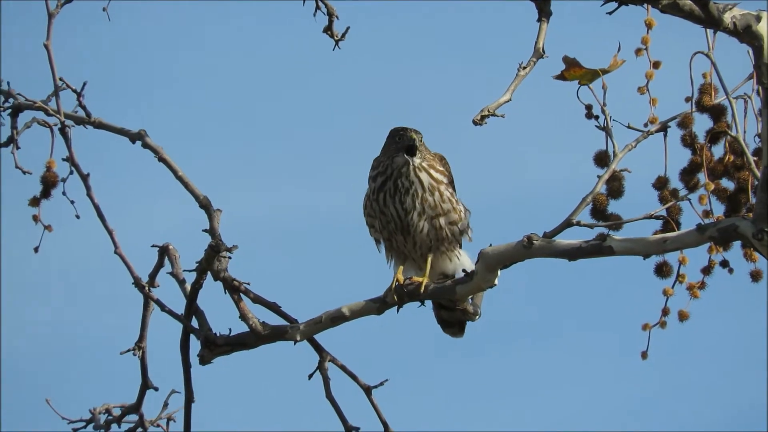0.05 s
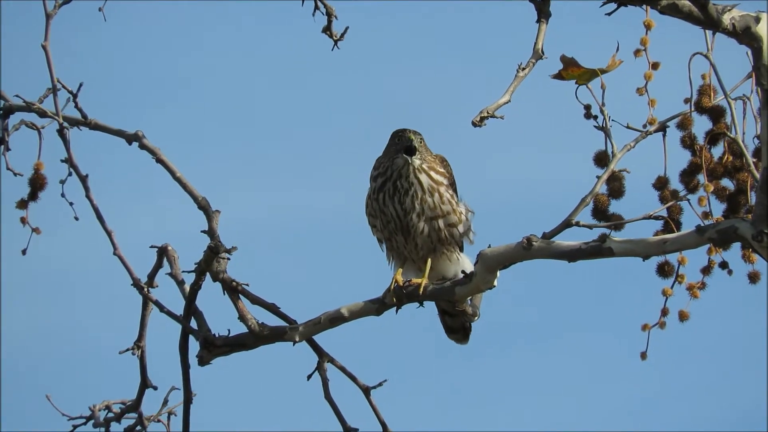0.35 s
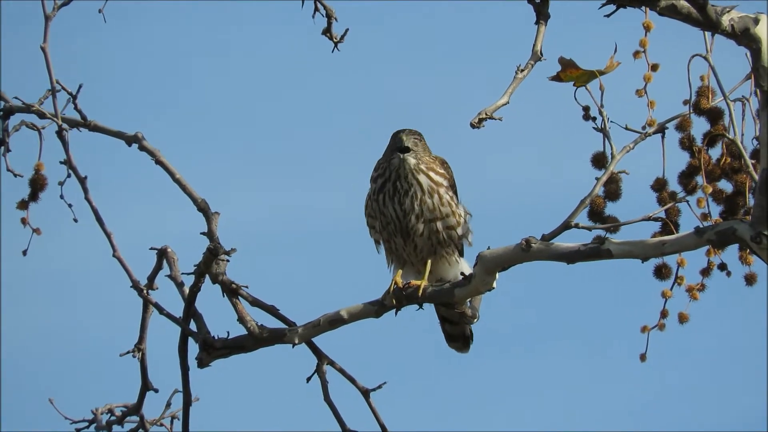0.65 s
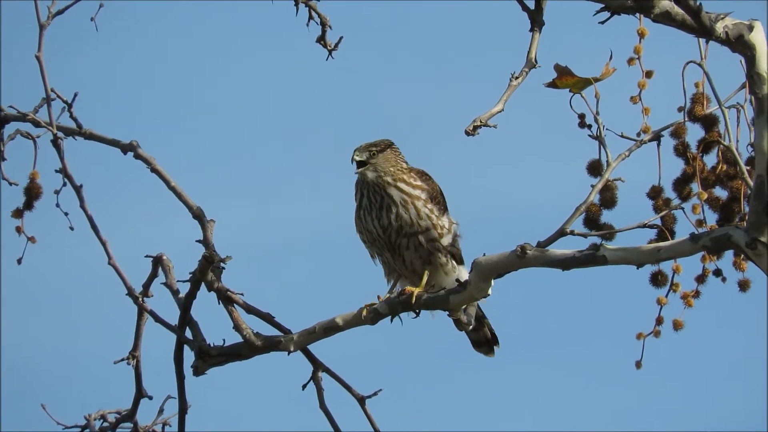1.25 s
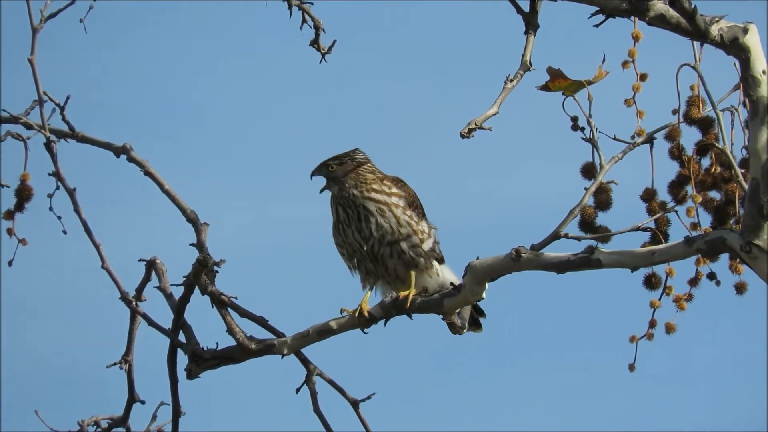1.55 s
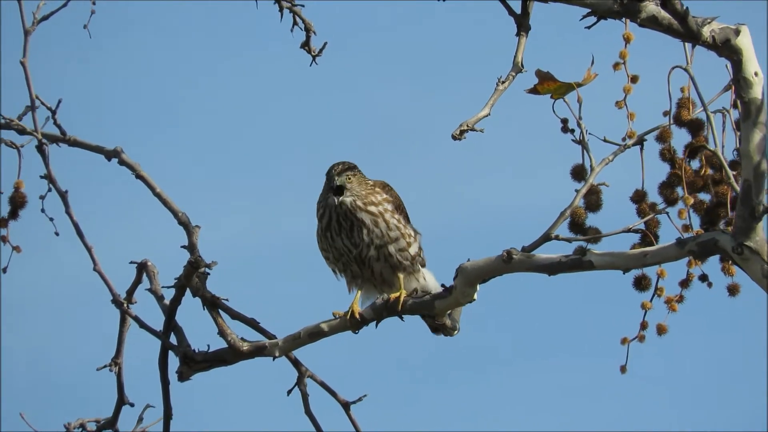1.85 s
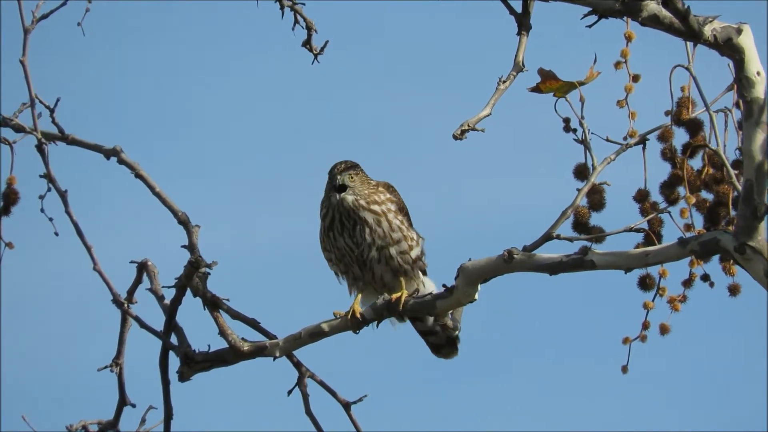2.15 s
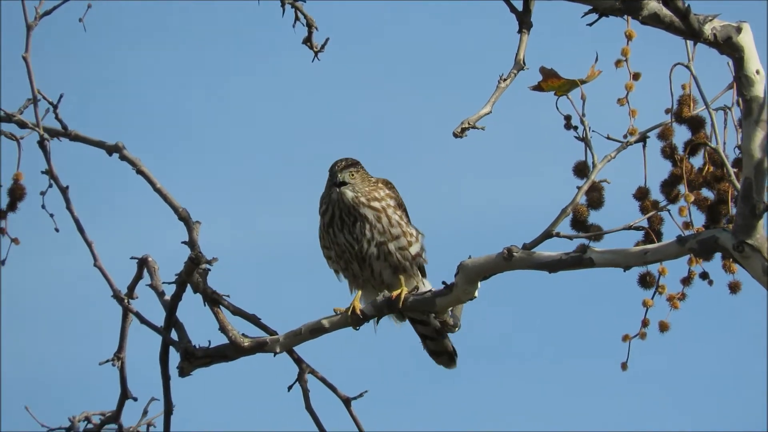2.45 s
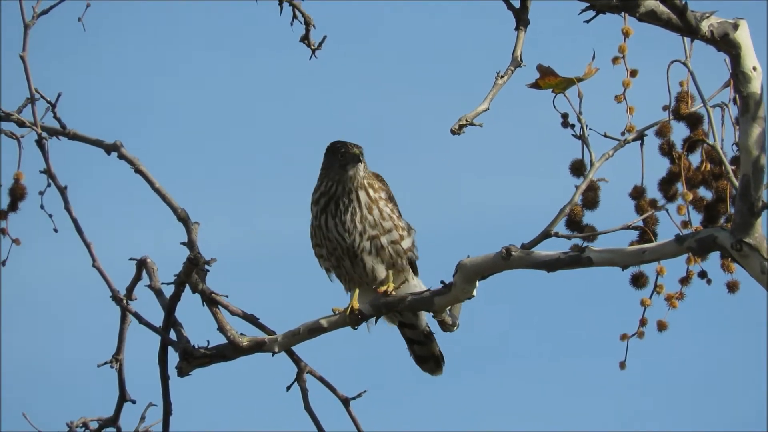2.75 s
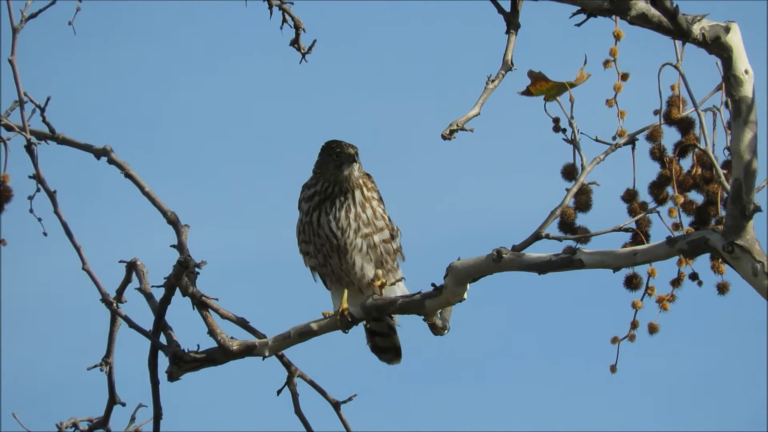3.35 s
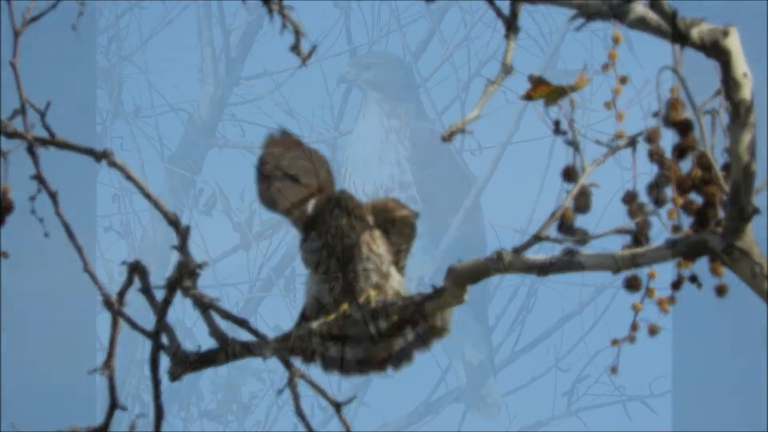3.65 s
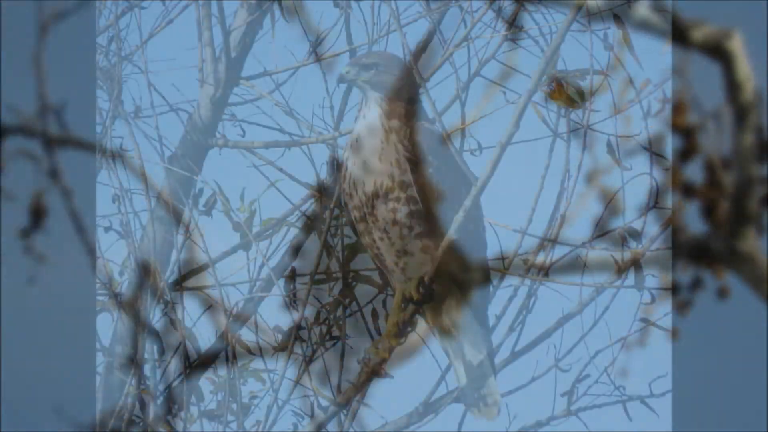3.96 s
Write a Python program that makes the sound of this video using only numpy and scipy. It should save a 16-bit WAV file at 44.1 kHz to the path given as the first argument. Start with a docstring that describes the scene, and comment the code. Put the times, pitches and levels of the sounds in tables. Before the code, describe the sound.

A hawk repeats short, raspy calls among trees, over faint bird whistles and far road noise. The calls and traffic drop in level, then the hawk stops, leaving low gusts of wind on the microphone.

```python
"""A hawk scolds with twenty harsh 'kek' notes, seven a second. Each is a pulsed source filtered by
the throat: a short arch of pitch that starts and ends in a rasp, scattered back by the trees.
Small birds whistle far off, distant traffic rumbles, and turbulent gusts buffet the microphone.
The hawk, the small birds and the traffic get quieter together in two steps."""
import sys
import numpy as np
from scipy import signal
from scipy.fft import rfft, irfft
from scipy.io import wavfile
from scipy.ndimage import uniform_filter1d

SR = 44100
rng = np.random.default_rng(int(sys.argv[2]) if len(sys.argv) > 2 else 0)


def wav_record(signal):
    """Record a signal, one row per channel, as 16-bit PCM in the file named by sys.argv[1]."""
    frames = np.transpose(np.atleast_2d(signal))
    bounded = np.clip(frames, -1, 1)
    # unit amplitude maps onto the largest positive 16-bit level
    quanta = np.round(bounded * 32767).astype(np.int16)
    wavfile.write(sys.argv[1], SR, quanta)


N = 176400
TIME = np.arange(N) / SR


def from_db(db):
    """Amplitude ratio: a factor of ten for every 20 dB."""
    return 10 ** (np.asarray(db) / 20)


def unit_rms(x):
    """Normalisation to a mean power of one."""
    return x / np.sqrt(np.mean(x ** 2) + 1e-20)


def gain_curve(rows):
    """Gain over time, by linear interpolation in decibels."""
    return from_db(np.interp(TIME, *np.transpose(rows)))


def db_at(spectrum, hz):
    """Level of a spectrum, by interpolation in log frequency."""
    f, db = np.transpose(spectrum)
    return np.interp(np.log(np.maximum(hz, 1)), np.log(f), db)


def noise(spectrum, size):
    """Spectral shaping: white noise filtered to a given colour, at unit rms."""
    gain = from_db(db_at(spectrum, np.fft.rfftfreq(size, 1 / SR)))
    return unit_rms(irfft(rfft(rng.standard_normal(size)) * gain, size))


def drift(corner_hz, size):
    """Low-pass noise: a smooth random wander at unit rms."""
    f = np.fft.rfftfreq(size, 1 / SR)
    return unit_rms(irfft(rfft(rng.standard_normal(size)) / (1 + (f / corner_hz) ** 2), size))


def add(out, start_s, x):
    """Superposition of a sound from a given moment."""
    i = max(int(start_s * SR), 0)
    out[i:i + len(x)] += x[:max(N - i, 0)]


# Swell of the road roar. Each row: time in seconds, relative level in dB.
ROAD_SWELL = [(0, -24.5), (.6, -24.5), (1.35, -27.5), (1.9, -26.5), (2.2, -32.5), (2.85, -28), (3.4, -26.5),
              (4, -25.5)]
# Its spectrum. Each row: frequency in Hz, relative level in dB.
ROAD_SPECTRUM = [(25, -19), (60, -2), (185, -2.5), (250, 1.5), (370, -3.5), (520, -0.5), (720, -2.5),
                 (1050, -7), (1450, -15.5), (2000, -17), (2700, -25), (3900, -22.5), (4700, -34),
                 (8000, -37.5), (16000, -40.5)]
# Far engines. Each row: frequency in Hz, relative level in dB.
ENGINE_TONES = [(532, -39), (611, -37)]

def traffic():
    """Broadband road noise plus tonal engine hum under slight frequency modulation."""
    hum = np.zeros(N)
    for hz, db in ENGINE_TONES:
        pitch = hz * (1 + .0079 * drift(24.2, N))
        hum += from_db(db) * np.sin(2 * np.pi * np.cumsum(pitch) / SR)
    return gain_curve(ROAD_SWELL) * noise(ROAD_SPECTRUM, N) + hum


# Sharp buffets. Each row: time in seconds, half-width of the push in seconds, relative level in dB.
BUFFETS = [(2.1092, .0007, -3), (2.161, .0011, -12.5)]

def buffets():
    """Pressure transients on the microphone, each a short push inside a longer pull."""
    out = np.zeros(N)
    for centre, width, db in BUFFETS:
        u = (TIME - centre) / width
        out += from_db(db) * (1.59 * np.exp(-u ** 2) - np.exp(-(u / 3.6 - .5) ** 2))
    return out


# Underlying breeze. Each row: time in seconds, relative level in dB.
BREEZE_LEVEL = [(0, -17), (.45, -23), (1.05, -23.5), (1.25, -32), (1.65, -25.5), (2.2, -23.5),
                (2.35, -35.5), (2.55, -44.5), (2.9, -38), (3.3, -32), (3.62, -42.5), (4, -46)]
# Gusts. Each row: centre in seconds, half-width in seconds, relative level in dB.
WIND_GUSTS = [(.018, 0.0064, -11), (.22, 0.026, -19.5), (.39, 0.049, -14.5), (.888, 0.014, -16),
              (1.005, 0.014, -14), (1.412, 0.017, -11.5), (1.477, 0.014, -7.5), (1.529, 0.023, -15.5),
              (1.599, 0.005, -10), (1.961, 0.023, -15.5), (2.04, 0.042, -20), (2.11, 0.031, -20.5),
              (2.18, 0.048, -28), (2.694, 0.025, -25.5), (3.079, .018, -19), (3.127, 0.018, -19),
              (3.43, .012, -18), (3.472, 0.01, -16), (3.749, 0.024, -31.5)]
# Spectrum of the turbulence. Each row: frequency in Hz, relative level in dB.
EDDY_SPECTRUM = [(20, -15.5), (45, 0), (65, 2.5), (130, -3.5), (240, -16), (400, -30), (800, -38.5),
                 (8000, -85)]

def wind():
    """Turbulence on the microphone: a low rumble in which breeze and gusts add in power."""
    power = gain_curve(BREEZE_LEVEL) ** 2
    for centre, width, db in WIND_GUSTS:
        power += from_db(db) ** 2 * np.exp(-((TIME - centre) / width) ** 2)
    eddies = noise(EDDY_SPECTRUM, N)
    eddies /= np.sqrt(uniform_filter1d(eddies ** 2, size=1400) + .097)  # evens out chance swells
    return np.sqrt(power) * eddies


# Far birds. Each row: start and length in seconds, first, middle and last pitch in Hz,
# relative level in dB.
BIRD_WHISTLES = [(0.248, .12, 3020, 3036, 3020, -33.5), (.767, 0.13, 1800, 1970, 2050, -36.5),
                 (0.931, .25, 2047, 2145, 1897, -39.5), (3.76, .075, 6350, 6450, 6450, -47)]

def far_whistles(waver_hz=119, flutter=.44):
    """Gliding pure tones, roughened by random frequency and amplitude modulation."""
    out = np.zeros(N)
    for start, length, first, middle, last, db in BIRD_WHISTLES:
        u = np.linspace(0, 1, int(length * SR))
        glide = np.polyval(np.polyfit([0, .5, 1], [first, middle, last], 2), u)
        phase = 2 * np.pi * np.cumsum(glide + waver_hz * drift(170, SR)[:len(u)]) / SR
        envelope = np.abs(np.sin(np.pi * u)) ** .5 * (1 + flutter * drift(100, SR)[:len(u)])
        add(out, start, from_db(db) * envelope * np.sin(phase))
    return out


# Spectrum of a small bird's chip. Each row: frequency in Hz, relative level in dB.
CHIP_SPECTRUM = [(2500, -20), (3800, 0), (6300, -6), (8500, -15), (11000, -30)]

def far_chip(start_s=3.759, gain_db=-38, attack_s=.005, decay_s=.035):
    """One dry chip: a noise burst with exponential decay."""
    out = np.zeros(N)
    t = TIME[:SR // 2]
    envelope = np.minimum(t / attack_s, 1) * np.exp(-t / decay_s)
    add(out, start_s, from_db(gain_db) * noise(CHIP_SPECTRUM, len(t)) * envelope)
    return out


# Resonances of the hawk's throat, dark and bright. Each row: frequency in Hz, relative gain in dB.
DARK_THROAT = [(900, -15), (2100, -13), (2450, 0), (2850, 3.5), (3250, 2.5), (4150, -7.5), (4900, -12.5),
               (6400, -23.5), (7200, -31), (8400, -19.5), (10500, -29), (15000, -48)]
BRIGHT_THROAT = [(1400, -10), (2150, -5), (2450, -6.5), (2750, 4), (3200, -8), (3750, 2), (4350, 4),
                 (4650, -0.5), (5050, -18), (5950, -5), (7100, -26), (8500, -9), (10300, -30), (15000, -40)]

def throat_response(darkness):
    """Formant filter: a blend in decibels from bright (0) to dark (1)."""
    hz = np.geomspace(600, 16000, 120)
    return np.c_[hz, (1 - darkness) * db_at(BRIGHT_THROAT, hz) + darkness * db_at(DARK_THROAT, hz)]


def creak(t, onset_s=.0015, pulse_hz=420, decay_s=.0082, gain_db=-2):
    """The hard 'k': dark noise, amplitude-modulated by a few uneven, abrupt pulses."""
    started = t > onset_s
    cycles = np.cumsum(pulse_hz * (1 + .25 * drift(JITTER_HZ, len(t))) * started) / SR
    pulses = unit_rms(np.exp(-2 * (cycles % 1))) * started
    return from_db(gain_db) * noise(DARK_THROAT, len(t)) * pulses * np.exp(-t / decay_s)


NOTE_S, ATTACK_S, HOLD_S, FADE_DB, RELEASE_S = .0458, .012, .02, 10, .0064
TOP_S, RISE, SAG = .023, .24, .07  # moment of top pitch; curvature of the arch before and after it
CLEAR_FROM_S, CLEAR_UNTIL_S, BLEND_S = .0079, .852 * NOTE_S, .0027  # the span free of rasp
JITTER_HZ, WANDER_HZ = 470, 42  # bandwidths of fast and slow unsteadiness
OPEN_S, SHUT_DB_PER_OCTAVE, TILT_ABOVE_HZ = .0099, -14, 3600  # the treble opens late
FORMANT_LIFT, FORMANT_SINK_S = .092, .029  # resonances start this share high, then sink into place

def kek(top_hz, darkness):
    """Source-filter model of one note: jitter, shimmer and breath noise make both ends rasp."""
    t = TIME[:4096]
    pitch = top_hz * (1 - np.where(t < TOP_S, RISE, SAG) * np.minimum((t / TOP_S - 1) ** 2, 2))
    rasp = 1 + .5 * (np.tanh((t - CLEAR_UNTIL_S) / BLEND_S) - np.tanh((t - CLEAR_FROM_S) / BLEND_S))
    jitter = (.013 + .0696 * rasp) * drift(JITTER_HZ, len(t))
    wander = .0076 * drift(WANDER_HZ, len(t))
    phase = 2 * np.pi * np.cumsum(pitch * (1 + jitter + wander)) / SR

    throat = throat_response(darkness)
    orders = np.arange(1, 19)[:, None]
    formant_scale = 1 + FORMANT_LIFT * np.maximum(1 - t / FORMANT_SINK_S, 0)
    shut = np.exp(-(t / OPEN_S) ** 2)
    db = db_at(throat, orders * pitch / formant_scale)
    db += SHUT_DB_PER_OCTAVE * shut * np.log2(np.maximum(orders * pitch / TILT_ABOVE_HZ, 1))
    db += 2.5 * rng.standard_normal(orders.shape)  # each note has its own colour
    harmonics = from_db(db) * np.cos(orders * phase + rng.uniform(-.23, 1, orders.shape))
    shimmer = (.13 + .42 * rasp) * drift(JITTER_HZ, len(t))
    voice = unit_rms(harmonics.sum(0)) * (1 + shimmer)

    breath = noise(throat, len(t)) * (1 + np.cos(phase))  # one puff for each throat pulse
    breath *= (1 - .5 * shut) * from_db(-14.5 + 9 * rasp)
    attack = np.minimum(t / ATTACK_S, 1) ** 2
    fade = from_db(-FADE_DB * np.maximum(t - HOLD_S, 0) / (NOTE_S - HOLD_S))
    release = np.exp(-np.maximum(t - NOTE_S, 0) / RELEASE_S)
    return (voice + breath) * attack * fade * release + creak(t)


# The hawk's notes. Each row: start in seconds, top pitch in Hz, relative level in dB,
# throat darkness from 0 to 1.
HAWK_NOTES = [(.002, 743, -30.5, 0.26), (0.145, 747, -29, 0.15), (.286, 773, -28.5, 0.044),
              (.426, 765, -29, 0.19), (0.564, 762, -30, 0.16), (0.699, 767, -30, 0.025),
              (.839, 772, -29, 0.3), (.978, 774, -29.5, 0.23), (1.118, 831, -27, 0.63),
              (1.257, 788, -32, 0.29), (1.398, 772, -34, 0.29), (1.535, 848, -26.5, 0.7),
              (1.675, 820, -30, 0.74), (1.818, 815, -29.5, 0.74), (1.956, 823, -29, 0.59),
              (2.089, 818, -29.5, 0.82), (2.230, 839, -31.5, 0.9), (2.369, 827, -29.5, 0.53),
              (2.502, 826, -30, 0.48), (2.640, 783, -32, 0.41)]

def hawk(scatter_db=-11.5, scatter_decay_s=.048):
    """Direct notes plus scattering from branches and ground, by convolution with decaying noise."""
    direct = np.zeros(N)
    for start, top_hz, db, darkness in HAWK_NOTES:
        add(direct, start, from_db(db) * kek(top_hz, darkness))
    t = TIME[:SR // 2]
    response = rng.standard_normal(len(t)) * np.exp(-t / scatter_decay_s)
    response /= np.linalg.norm(response)
    return direct + from_db(scatter_db) * signal.fftconvolve(direct, response)[:N]


# Two downward steps in the level of all but the wind. Each row: time in seconds, gain in dB.
LEVEL_STEPS = [(0, 0), (1.42, 0), (1.5, -12), (3.43, -12.5), (3.5, -21.5)]

def scene():
    """Superposition: birds and traffic share one gain, and the wind adds on top."""
    birds_and_road = hawk() + far_whistles() + far_chip() + traffic()
    return (gain_curve(LEVEL_STEPS) * birds_and_road + wind() + buffets())[None]


def record(dry):
    """Soft saturation rounds the strongest buffets; a steep low-pass filter cuts the top."""
    ceiling, cutoff_hz = .65, 15900
    limited = dry / (1 + (dry / ceiling) ** 6) ** (1 / 6)
    return signal.sosfilt(signal.ellip(10, .1, 80, cutoff_hz, fs=SR, output="sos"), limited)


dry = scene()
out = record(dry)
wav_record(out)
```